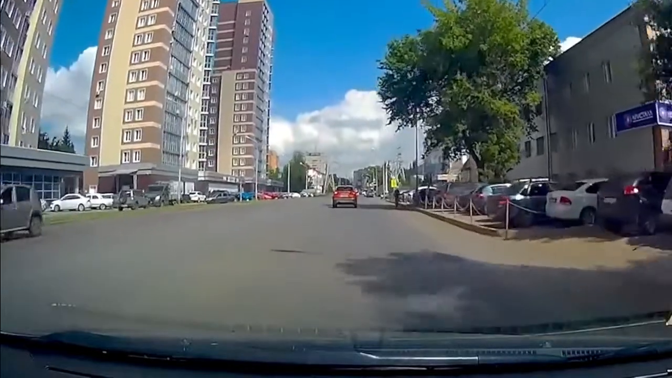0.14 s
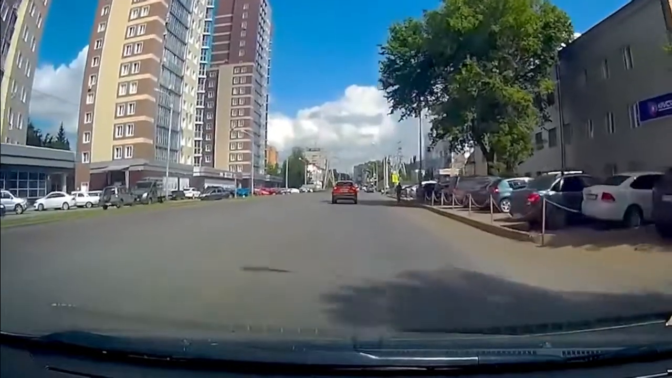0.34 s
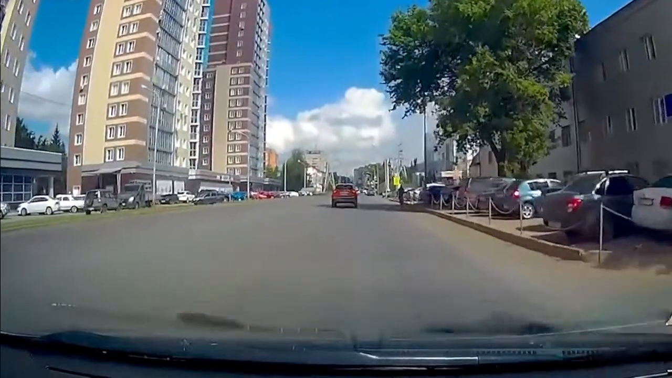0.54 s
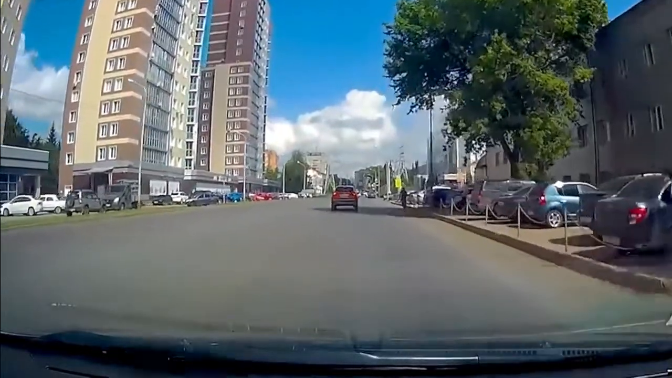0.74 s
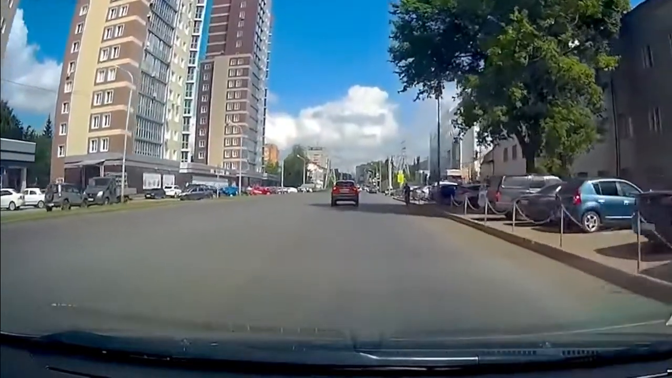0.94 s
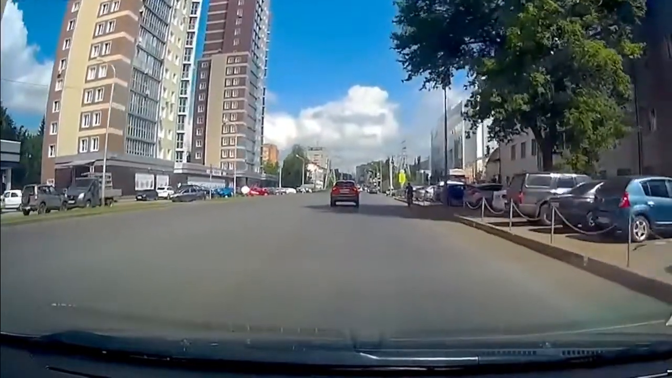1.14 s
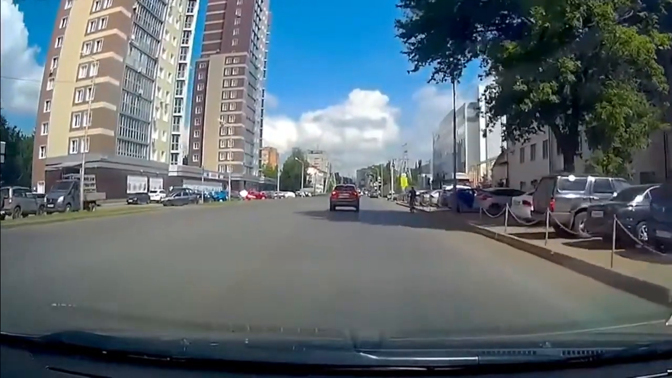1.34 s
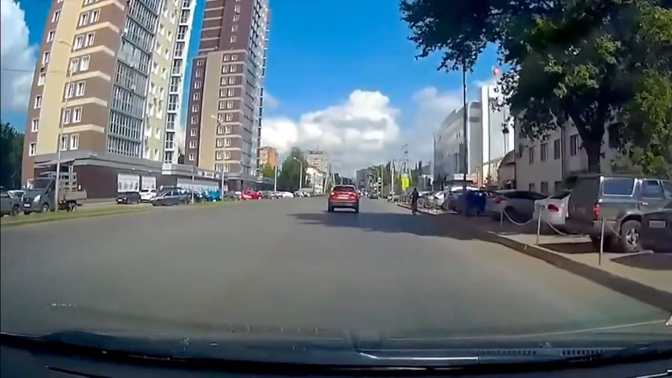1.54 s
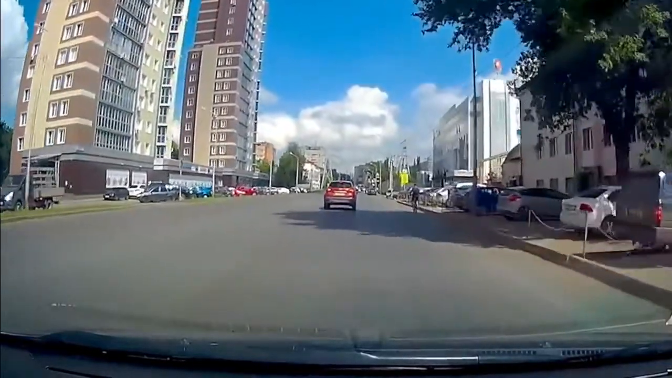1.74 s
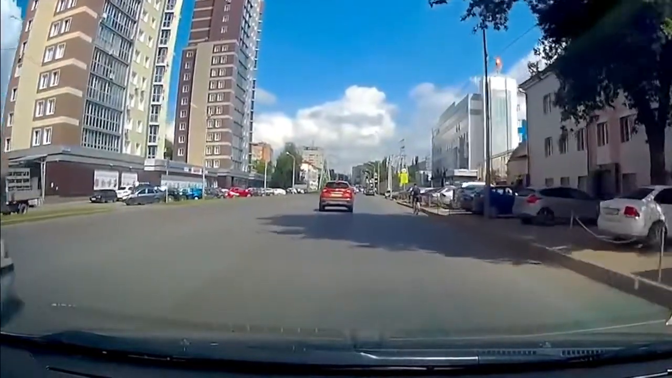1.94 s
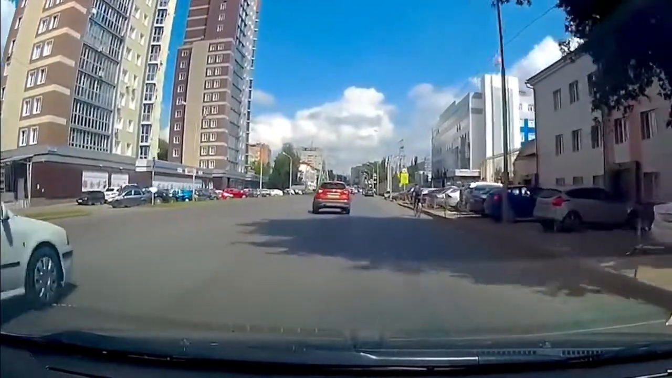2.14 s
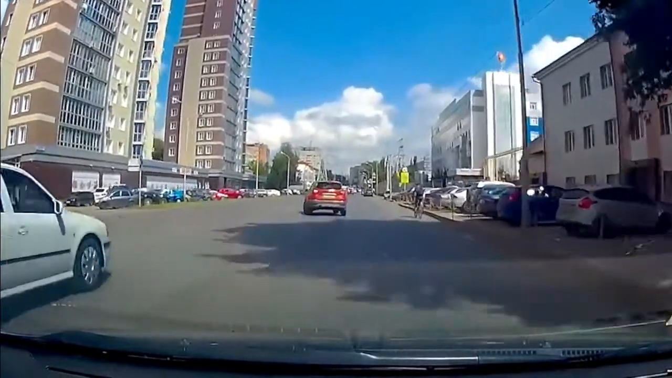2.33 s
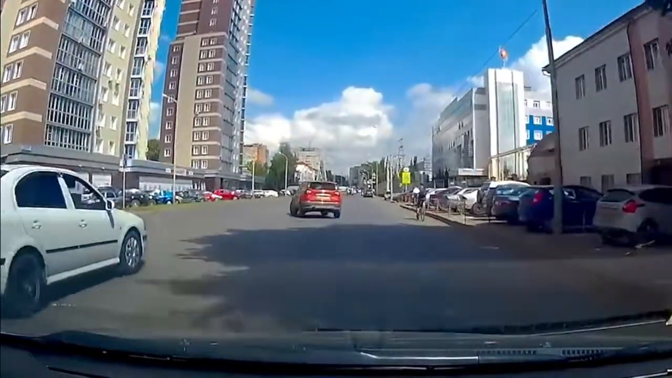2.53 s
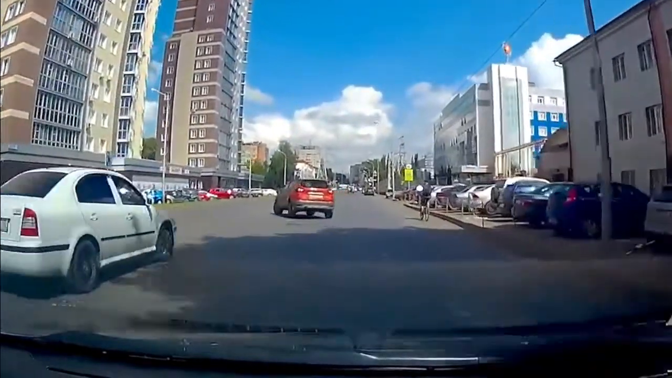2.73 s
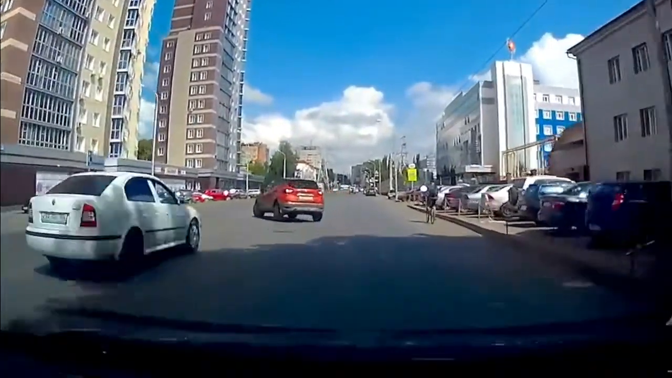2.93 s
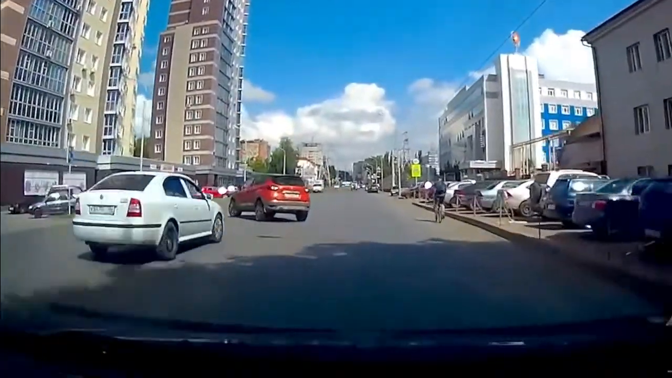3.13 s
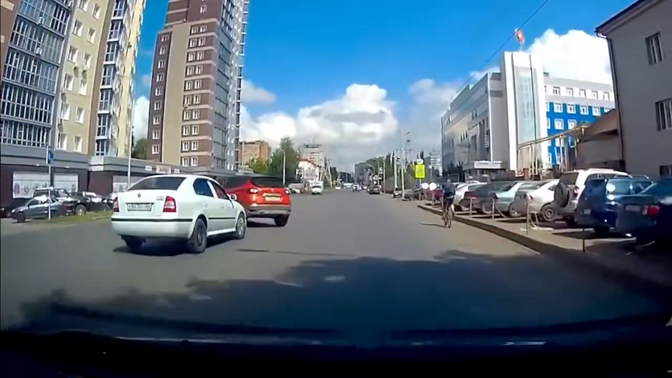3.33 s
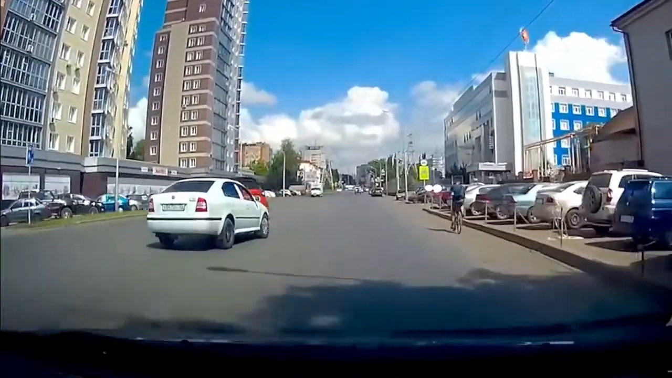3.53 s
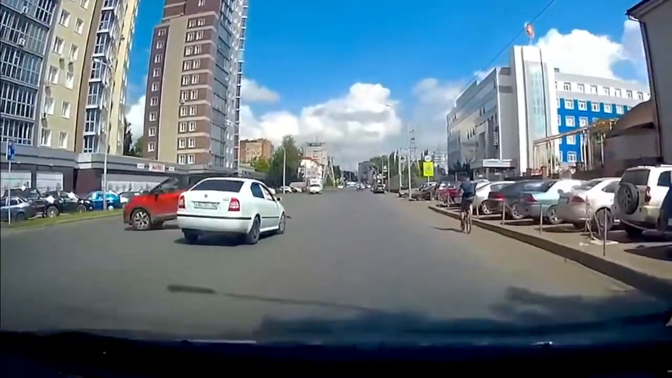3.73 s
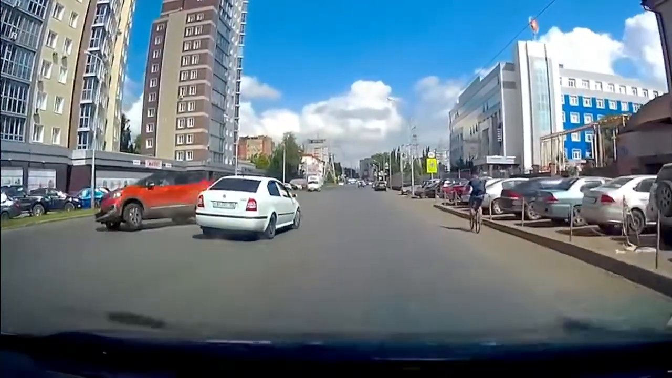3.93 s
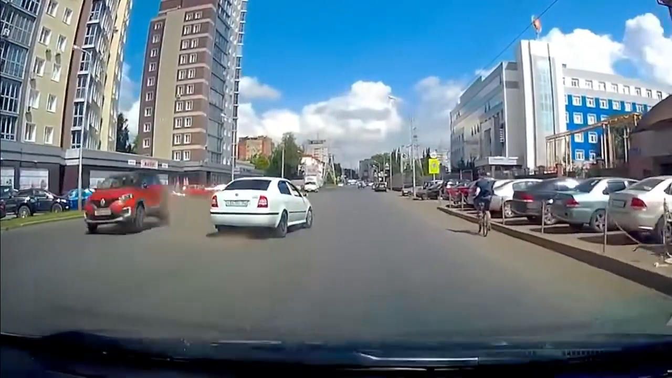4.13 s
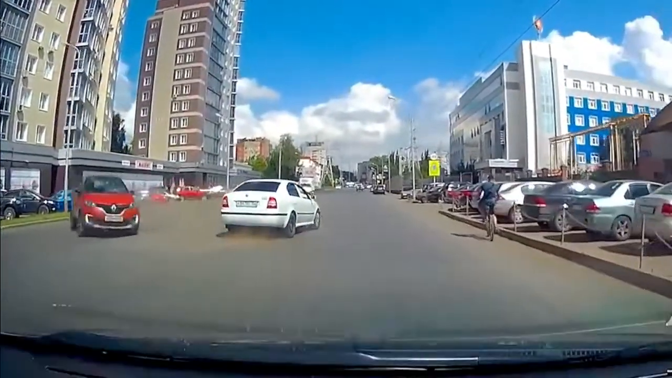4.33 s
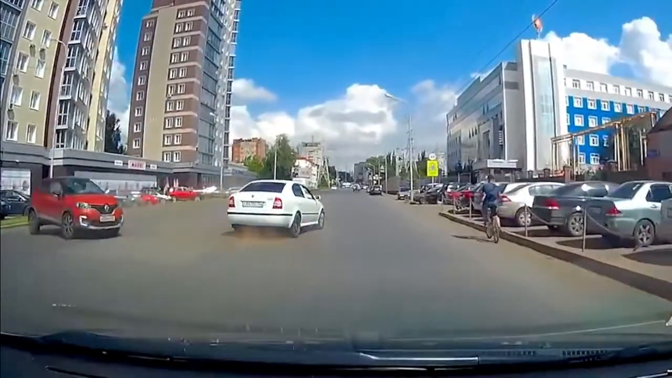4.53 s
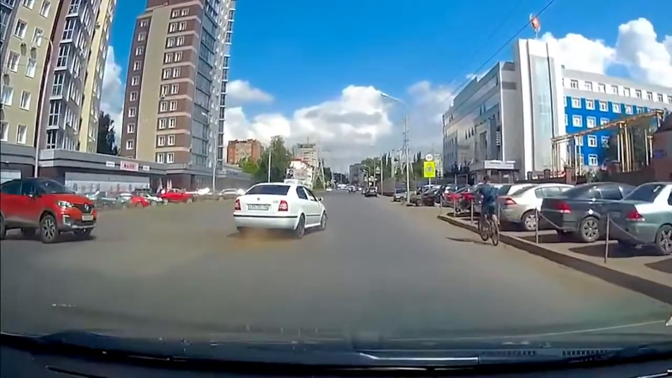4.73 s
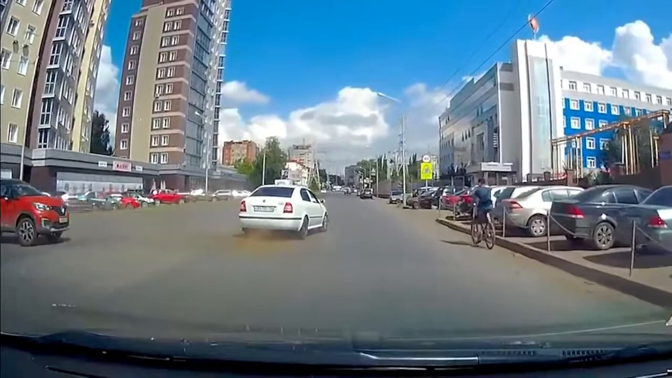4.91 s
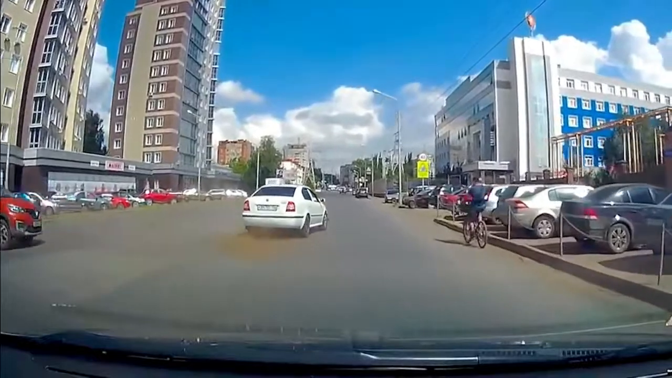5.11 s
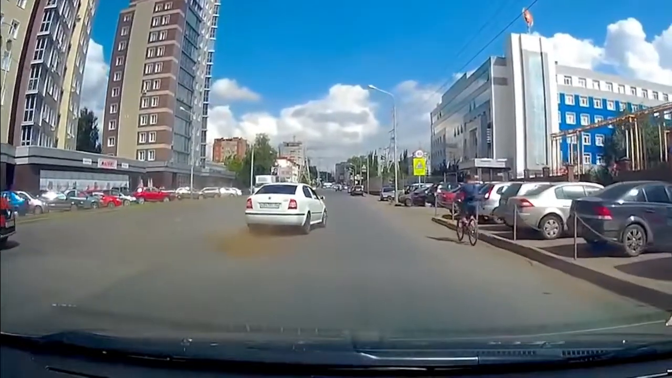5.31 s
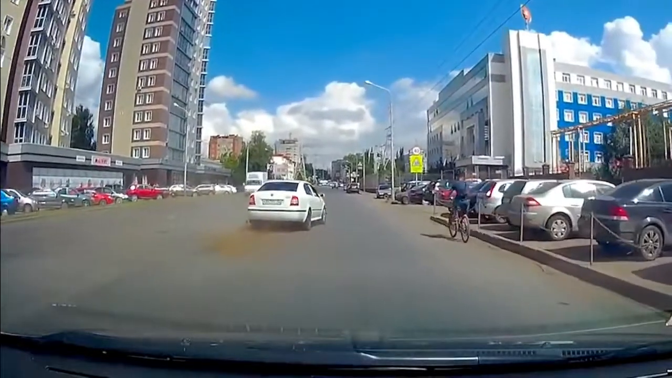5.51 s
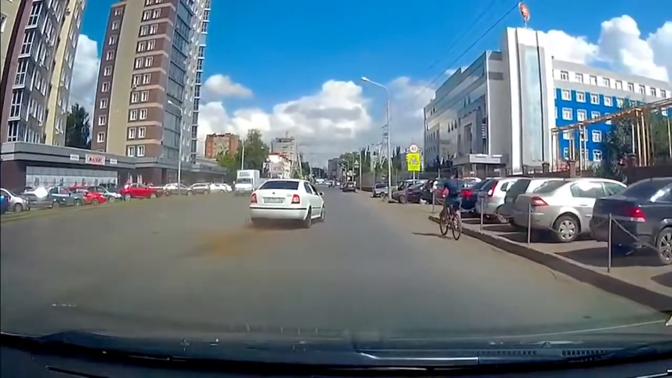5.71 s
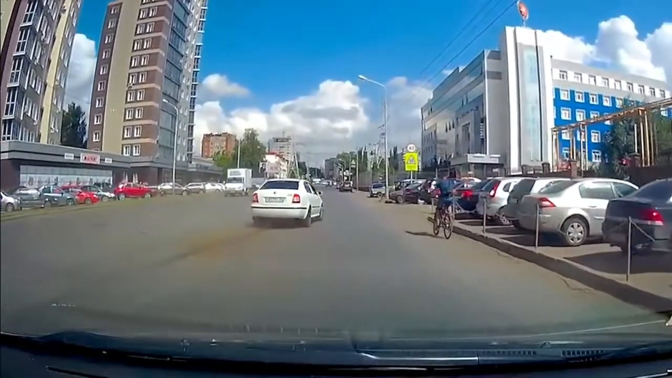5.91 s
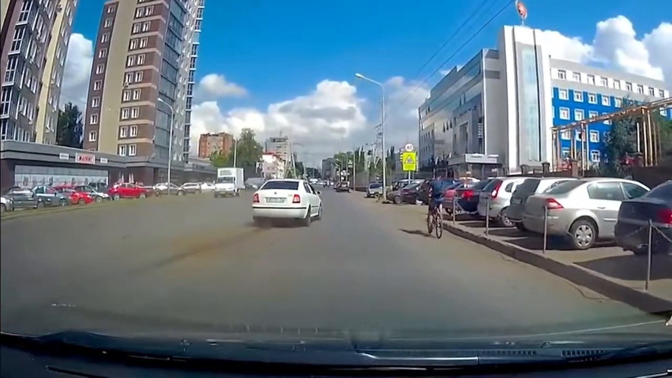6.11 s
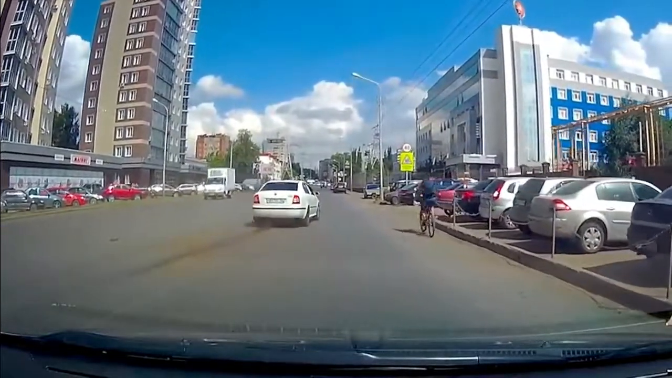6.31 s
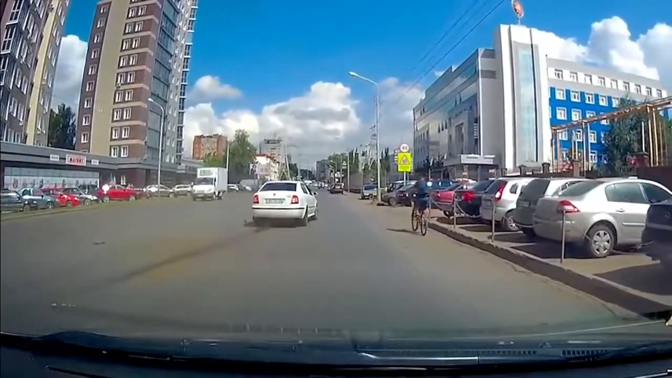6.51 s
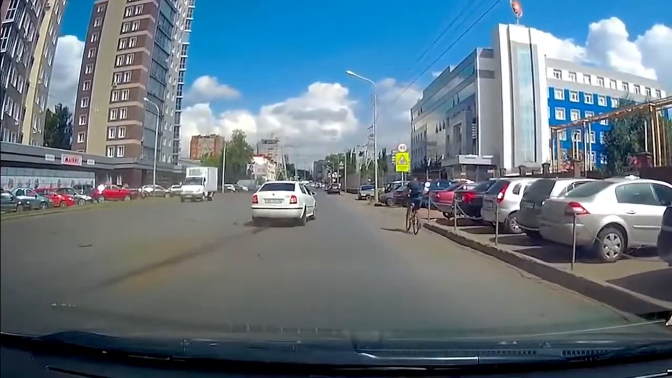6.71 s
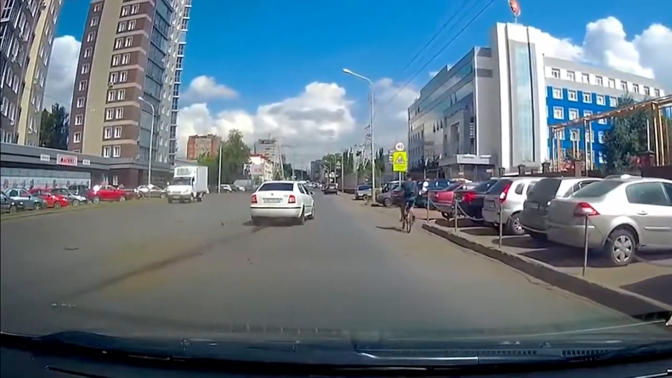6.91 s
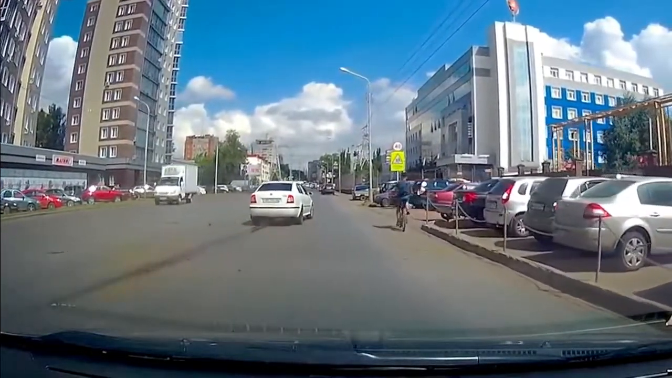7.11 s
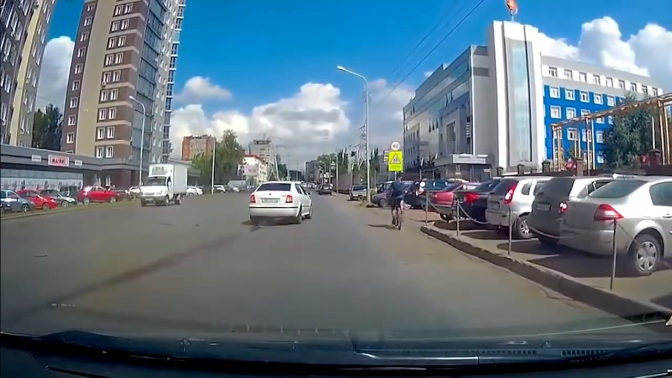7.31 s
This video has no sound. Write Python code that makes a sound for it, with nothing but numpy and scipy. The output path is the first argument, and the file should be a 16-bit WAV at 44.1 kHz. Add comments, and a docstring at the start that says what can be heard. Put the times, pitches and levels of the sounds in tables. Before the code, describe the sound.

From inside a moving car, low body rumble, a boomy drone near the bottom of the range and grainy tyre roar fill the first three seconds. The roar swells around 1.1 to 2 seconds as another car passes, with dull bumps near 1.1, 1.3 and 3.1. At about 3.25 tyres ahead chirp high and wavering. From 3.6 to 3.8 rapid hollow thuds and crunches fuse into one loud collision, with splintering behind. From 3.9 to 5.3 a spinning car screeches in rough, broken bites, mostly climbing in pitch, over scrubbing rubber; strongest around 4.6. Small fragments tick, clatter and clink until about 6, with street echo. The listening car slows, its rumble thinning, with a soft jolt near 5. After 6 a very faint, high brake tone pulses and bends over low rumble and microphone hiss.

```python
"""Street crash heard from a moving car

Low rumble and tyre roar, made of coloured noise, fill the cabin, while another car passes early on.
Ahead, tyres chirp and screech: wavering tones with overtones. Two cars collide in quick bursts of noise.
Debris clatters as noise bursts and short ringing tones, and the street adds an echo.
The listening car slows, and near the end one brake sings faintly as a tone that bends in pitch."""
import sys
import numpy as np
from scipy import signal
from scipy.fft import rfft, irfft, next_fast_len
from scipy.io import wavfile
from scipy.ndimage import uniform_filter1d, map_coordinates

SR = 44100
rng = np.random.default_rng(int(sys.argv[2]) if len(sys.argv) > 2 else 0)


def persist_wave(psi):
    """Save psi, clipped to +-1, as 16-bit WAV."""
    counts = np.round(np.clip(psi, -1, 1) * 32767).astype(np.int16)
    wavfile.write(sys.argv[1], SR, np.atleast_2d(counts).T)


N = 324261

# Body panels colliding: start_s, thud_db, crunch_db, fade_s (time to fall 60 dB)
BLOWS = [(3.602, -46, -38, .15), (3.687, -16, -32.5, 0.35), (3.703, -18, -18.5, 0.32),
         (3.736, -15, -21, 0.27), (3.776, -17, -24, 0.49), (3.81, -35, -27.5, 0.35)]
# Hollow resonances of the panels: pitch_hz, width_hz, relative_level_db
PANEL_MODES = [(41, 15, 11.5), (119, 28, 5.5), (168, 43, 7), (246, 34, 1.5), (336, 130, -1),
               (446, 31, -2.5)]
# Colour of the crunch: pitch_hz, relative_level_db (per Hz)
CRUNCH_COLOUR = [(260, -46), (450, -22), (503, -1.5), (695, -12), (788, -2), (1060, -1.5), (1140, -6.5),
                 (1660, -11), (2400, -50), (3120, -68), (5280, -120)]
# Colour of breaking plastic and glass: pitch_hz, relative_level_db (per Hz)
SHARD_COLOUR = [(600, -71), (1200, -25.5), (1700, 10), (2500, 7), (4000, 7.5), (4800, -3.5), (6000, 2.5),
                (6600, -7), (7500, -2.5), (9100, -13.5), (11100, -15), (15900, -35.5)]
# Lamps and bumpers splintering
SHATTER_START_S, SHATTER_LENGTH_S, SHATTER_DB = 3.695, 0.081, -39

# The swerve before the blow: time_s, pitch_hz, level_db
SWERVE = [(3.22, 1856, -68), (3.27, 1784, -35.5), (3.4, 1638, -32), (3.47, 1633, -39.5),
          (3.55, 1687, -49.5), (3.64, 1734, -37.5), (3.71, 1646, -54)]
# The second swerving tyre: pitch ratio, level against the first, and its loss from the swerve's start
PARTNER_RATIO, PARTNER_DB, PARTNER_FADE_DB_PER_S = 1.155, -2.5, 24.5
# Pitch of the spinning car's front tyres: time_s, pitch_hz
FRONT_PITCH = [(4.12, 808), (4.175, 655.6), (4.2, 833), (4.29, 809.5), (4.54, 865), (4.64, 975),
               (4.72, 996.6), (4.81, 939.4), (5.12, 1108), (5.8, 1115)]
# Pitch of its rear tyres: time_s, pitch_hz
REAR_PITCH = [(3.9, 1045), (4.38, 1028), (4.82, 1068), (4.9, 1108), (5.02, 1249), (5.15, 1181)]
# Front tyres biting, before the spin fades: start_s, length_s, level_db, roughness (0-1), octave_db
# (octave_db is the octave overtone before squeal() lowers it by 1 dB and wavers it)
FRONT_BITES = [(4.095, 0.085, -26.5, 0.68, -11), (4.19, .15, -28.5, 0.38, 1.5),
               (4.545, 0.12, -23.5, 0.64, -5.5), (4.625, 0.13, -18.5, .36, -18.5),
               (4.845, 0.13, -25, 0.54, -19.5), (5.03, 0.081, -29, 0.5, -14),
               (5.115, 0.11, -24, 0.34, -21.5), (5.24, 0.6, -29, 0.49, -23)]
# Rear tyres biting, same meaning: start_s, length_s, level_db, roughness (0-1), octave_db
REAR_BITES = [(3.89, 0.013, -24.5, 0.34, -13), (3.98, 0.088, -25.5, 0.31, -23),
              (4.35, 0.028, -23.5, .6, -19), (4.5, 0.042, -26, 0.61, -22), (4.68, .11, -25.5, .4, -19),
              (4.9, .18, -28.5, 0.76, -23.5), (5.14, .6, -33.5, 0.81, -32)]
# Rise time and 60 dB fall time of each bite; then when the spin runs out and how fast it fades
BITE_RISE_S, BITE_FADE_S, SPIN_ENDS_S, SPIN_FADE_DB_PER_S = .01, .14, 5.11, 45.5
# Short high yelps of the tread: start_s, length_s, pitch_hz, level_db
YELPS = [(3.88, 0.033, 2167, -33.5), (3.927, 0.025, 2190, -44), (4.337, 0.035, 2172, -40),
         (4.742, 0.066, 1850, -40.5)]
# What the windscreen does to the squeals: pitch_hz, gain_db
WINDSCREEN = [(500, 3), (1700, -3), (2150, -2), (2450, -6), (3000, 2), (3450, -1), (4050, 1), (4600, -13),
              (5300, -4.5), (6000, 10), (8000, -23)]
# Rubber and torn trim scrubbing over the asphalt: time_s, level_db (before wavering)
SLIDE = [(3.92, -48), (3.98, -24.5), (4.18, -29), (4.28, -34.5), (4.37, -30), (4.6, -30.5), (4.8, -39.5),
         (5.6, -51.5), (6.5, -68)]
# Colour of that scrubbing: pitch_hz, relative_level_db (per Hz)
SCRUB_COLOUR = [(260, -51), (450, -19.5), (643, -11), (835, -3), (932, -5), (1030, 8.5), (1150, -5.5),
                (1310, 1), (1470, -11), (1660, -7), (1850, -21.5), (3890, -32.5), (12000, -59),
                (15600, -76.5), (22000, -120)]

# The largest fragments landing: start_s, level_db (before the overall debris gain)
DEBRIS = [(4.1634, -45.5), (4.1969, -49), (4.3206, -50.5), (4.4448, -46.5), (4.4794, -50), (4.6264, -52),
          (4.7646, -49), (4.8304, -48), (5.0235, -52), (5.0484, -51), (5.1284, -58), (5.1916, -57),
          (5.237, -53), (5.3328, -53.5), (5.453, -58), (5.5364, -56.5), (5.5947, -55), (5.7029, -58)]
# Small pieces tumbling on: first level, then the loss as they scatter
TUMBLE_START_S, TUMBLE_LENGTH_S, TUMBLE_DB, TUMBLE_LOSS_DB_PER_S = 3.91, 2.25, -51.5, 6.5
# Loose trim and bright shards ringing: start_s, pitch_hz, level_db (before the attack and fade)
CLINKS = [(4.169, 3250, -38), (5.333, 3260, -46.5), (5.545, 1690, -40), (5.555, 4000, -56),
          (5.615, 1646, -58), (5.76, 1698, -49), (5.769, 3930, -56), (5.834, 4010, -54), (6.03, 3916, -59)]

# The listening car's speed: time_s, share_of_cruising_speed
SPEED = [(0, 1.044), (2.2, 0.89), (3.05, 1.034), (3.7, 0.75), (4.4, 0.56), (5.3, 0.39), (6.4, 0.27),
         (7.35, .27)]
# Tyre roar on asphalt: time_s, level_db (before wavering)
ROLL = [(0, -37), (.7, -33), (1.25, -29.5), (1.9, -33), (2.3, -35), (3.2, -39.5), (4.2, -41.5),
        (4.9, -55.5), (7.35, -55)]
# Uneven stretches of road rocking the body: start_s, length_s, level_db
UNEVEN = [(0.0, 0.14, -28), (1.306, .15, -28), (4.963, 0.34, -28), (7.07, .25, -37)]
# Colour of the body's sway: pitch_hz, relative_level_db (per Hz)
SWAY_COLOUR = [(9, -31.5), (18, -3), (28, 10), (41, -10), (53, 6), (61, -12), (73, -15.5), (105, -54.5),
               (175, -110)]
# Colour of the cabin's early boom: pitch_hz, relative_level_db (per Hz)
BOOM_COLOUR = [(35, -2), (60, -1), (81, -5), (109, -6.5), (147, 0), (204, -9.5), (321, -12.5), (416, -19.5),
               (470, -22.5), (550, -29.5), (720, -27), (1210, -120)]
# Colour of its later boom, at low speed: pitch_hz, relative_level_db (per Hz)
COAST_COLOUR = [(33, -37.5), (58, -31), (78, 1.5), (100, -2.5), (148, -3.5), (165, -1.5), (185, -7.5),
                (260, -13.5), (405, -18), (450, -26.5), (620, -26.5), (800, -53), (1400, -110)]
# Colour of the tyre roar: pitch_hz, relative_level_db (per Hz)
ROAR_COLOUR = [(240, -15.5), (400, 3.5), (468, -9.5), (599, 2.5), (700, -5.5), (830, 0.5), (1010, 4.5),
               (1120, 0), (1290, 3), (1610, -4), (2410, -20.5), (3960, -33), (4630, -50), (5630, -61.5),
               (9000, -84), (11700, -98), (19800, -120)]
# Colour of the tread's fine hiss: pitch_hz, relative_level_db (per Hz)
TREAD_COLOUR = [(950, -58), (1550, -6), (2050, 5.5), (2550, -7), (3850, -5.5), (4650, -21), (5750, -10.5),
                (6550, -26), (7550, -23.5), (9500, -42), (14000, -80)]
# Levels at cruising speed (dB) and their growth (dB per tenfold speed)
SWAY_DB, SWAY_GROWTH_DB, BOOM_DB, BOOM_GROWTH_DB = -28.5, 22, -26, 33.5
# Tread hiss: level at the loudest roar (dB), and dB lost for each dB the roar drops
FIZZ_DB, FIZZ_FOLLOWS = -52.5, 1.3
# Wheels dropping into dips: start_s, pitch_hz, level_db (before a 6.5 dB boost and the fade)
BUMPS = [(1.091, 43.6, -15.5), (1.28, 38.2, -15), (3.125, 41, -18.5), (4.956, 42.02, -24)]

# Colour of the overtaking car's tyres: pitch_hz, relative_level_db (per Hz)
PASSING_COLOUR = [(450, -33), (820, 10.5), (1100, -7), (1550, 1.5), (1900, -7.5), (2400, -23.5),
                  (3800, -19.5), (5800, -40), (9000, -51)]
# Echo of the street: pitch_hz, fade_s (time to fall 60 dB)
STREET = [(100, 0.23), (1000, 0.97), (4000, 0.92), (12000, 0.53)]
# Colour of the microphone's own noise: pitch_hz, relative_level_db (per Hz)
HISS_COLOUR = [(200, 2), (2500, 0.5), (5000, -1), (8500, -3.5), (11000, -3.5), (14800, -4.5), (15700, -14)]
TOP_HZ = 15650  # nothing is kept above this


def amp(db):
    """Turn decibels into a multiplier."""
    return 10 ** (np.asarray(db) / 20)


def unit(x):
    """Scale a sound to an average (rms) strength of 1."""
    return x / np.sqrt(np.mean(x ** 2) + 1e-20)


def clock():
    """Give the time of every sample in seconds."""
    return np.arange(N) / SR


def curves(rows):
    """Join table points with straight lines, one curve per column after the time."""
    s, *columns = np.transpose(rows)
    return [np.interp(clock(), s, column) for column in columns]


def during(rows):
    """Give 1 while a table lasts, with 10 ms soft edges, and 0 elsewhere."""
    since_start = clock() - rows[0][0]
    until_end = rows[-1][0] - clock()
    return np.clip(np.minimum(since_start, until_end) / .01, 0, 1)


def along(points, hz):
    """Read values between (pitch, value) points on a log pitch axis."""
    f, values = np.transpose(points)
    return np.interp(np.log(hz + 1), np.log(f + 1), values)


def wobble(rate):
    """Draw a smooth random curve with this many random points a second."""
    return map_coordinates(rng.standard_normal(N // 8), [clock() * rate], mode="wrap")


def filtered(x, response):
    """Strengthen or weaken each frequency of a sound by a response."""
    m = next_fast_len(N + SR // 2)
    hz = np.fft.rfftfreq(m, 1 / SR)
    return irfft(rfft(x, m) * response(hz), m)[:N]


def noise(colour, grain_db=0):
    """Make coloured noise of rms 1; grain_db clumps it into tiny snaps."""
    x = rng.standard_normal(N)
    if grain_db:
        x = x * amp(grain_db * wobble(700))
    return unit(filtered(x, lambda hz: amp(along(colour, hz))))


def burst(s, attack, t60):
    """Shape a blow at time s: a quick rise, then a fall of 60 dB in t60 seconds."""
    t = np.maximum(clock() - s, 0)
    return (1 - np.exp(-t / attack)) * np.exp(-np.log(1000) * t / t60)


def held(s, length, attack, t60):
    """Shape a sound that rises at time s, holds until its length has passed and dies away."""
    t = clock() - s
    rise = np.clip(t / attack, 0, 1)
    return rise * np.exp(-np.log(1000) * np.clip((t - length) / t60, 0, 2))


def crash():
    """Panels buckle in quick blows, each a hollow thud and a crunch; splintering swells just behind."""
    def panel_response(f):
        total = 0
        for k, (center, width, db) in enumerate(PANEL_MODES):
            damping = 1j * f * width
            # neighbouring resonances push in opposite directions
            total = total + (-1) ** k * amp(db) * damping / (center * center - f * f + damping)
        return total / (1 + (f / 650) ** 4)

    hollow = unit(filtered(rng.standard_normal(N), panel_response))
    # overlapping blows add as power
    thud = np.sqrt(sum((amp(db) * burst(s, 0.0041, t60)) ** 2 for s, db, _, t60 in BLOWS))
    crunch = np.sqrt(sum((amp(db) * burst(s, 0.0037, t60)) ** 2 for s, _, db, t60 in BLOWS))
    swell = held(SHATTER_START_S, SHATTER_LENGTH_S, attack=0.035, t60=0.68)
    splinters = amp(SHATTER_DB) * swell * noise(SHARD_COLOUR)
    return thud * hollow + crunch * noise(CRUNCH_COLOUR, grain_db=2.5) + splinters


def skid():
    """Tyres squeal through the windscreen's filter, over noise from scrubbing rubber and trim."""
    slide_db, = curves(SLIDE)
    scrub_gain = amp(slide_db + 2.7 * wobble(35)) * during(SLIDE)
    scrub = scrub_gain * noise(SCRUB_COLOUR, grain_db=2.0)
    squeals = swerve() + yelps() + spin()
    return filtered(squeals, lambda hz: amp(along(WINDSCREEN, hz))) + scrub


def swerve():
    """Two tyres chirp together under the same load, with pitches that move in step."""
    hz, db = curves(SWERVE)
    low = squeal(hz, rough=0.77, overtones_db=[-34], wander=.018, jitter=0.027, flutter_hz=258.5)
    high = squeal(PARTNER_RATIO * hz, rough=.85, overtones_db=[-8, -33],
                  wander=.01, jitter=0.026, flutter_hz=354)
    elapsed = np.maximum(clock() - SWERVE[0][0], 0)
    partner_db = PARTNER_DB - PARTNER_FADE_DB_PER_S * elapsed
    return amp(db) * during(SWERVE) * (low + amp(partner_db) * high)


def spin():
    """Front and rear tyres bite and screech at mostly climbing pitches, then fade as the spin runs out."""
    gain, rough, octave_db = bites(FRONT_BITES)
    third_db = 0.69 * octave_db - 22  # upper overtones follow the octave only in part
    front_hz, = curves(FRONT_PITCH)
    front = gain * squeal(front_hz, rough, overtones_db=[octave_db, third_db, third_db - 14.5],
                          wander=0.0285, jitter=0.045, flutter_hz=149.2)
    gain, rough, octave_db = bites(REAR_BITES)
    rear_hz, = curves(REAR_PITCH)
    rear = gain * squeal(rear_hz, rough, overtones_db=[octave_db, octave_db - 14],
                         wander=0.0416, jitter=0.041, flutter_hz=172.8)
    fade_db = -SPIN_FADE_DB_PER_S * np.maximum(clock() - SPIN_ENDS_S, 0)
    return amp(fade_db) * (front + rear)


def yelps():
    """The tread's edge catches for an instant, giving high, rough tones."""
    gain, hz = bites([(s, length, db, hz) for s, length, hz, db in YELPS])
    return gain * squeal(hz, rough=.78, overtones_db=[-26], wander=.02, jitter=.028, flutter_hz=220)


def squeal(hz, rough, overtones_db, wander, jitter, flutter_hz):
    """Tread sticks and slips at a wandering pitch; roughness breaks the tone into beating shreds."""
    rough = np.clip(rough, 0, 1)
    pitch = hz * (1 + rough * (wander * wobble(45) + jitter * wobble(420)))
    phase = 2 * np.pi * np.cumsum(pitch) / SR
    levels_db = [0] + [db - 1 + 4 * wobble(26) for db in overtones_db]
    out = np.zeros(N)
    for k, level_db in enumerate(levels_db, 1):
        rate = flutter_hz * np.sqrt(k)  # overtones fray more than the fundamental
        shreds = (wobble(rate) + 1j * wobble(rate)) / np.sqrt(2)
        steady = (1 - rough ** 2) ** np.sqrt(k)  # share of power left in the clean tone
        mix = np.sqrt(steady) + np.sqrt(1 - steady) * shreds
        out += amp(level_db) * np.real(mix * np.exp(1j * k * phase))
    return np.sqrt(2) * out


def bites(rows):
    """Join the tyre bites' loudness by power; other columns follow whichever bite is sounding."""
    power = np.array([(amp(db) * held(s, length, BITE_RISE_S, BITE_FADE_S)) ** 2
                      for s, length, db, *_ in rows])
    total = power.sum(axis=0)
    averages = np.array(rows)[:, 3:].T @ power / (total + 1e-30)
    return np.sqrt(total), *averages


def debris(gain_db=-1, t60=0.21, bright_db=2):
    """Plastic and glass land in short noise bursts, tilted by bright_db per octave, as small bits tumble."""
    landings = np.sqrt(sum((amp(db) * burst(s, 0.001, t60)) ** 2 for s, db in DEBRIS))
    colour = [(hz, db + bright_db * np.log2(hz)) for hz, db in SHARD_COLOUR]
    return amp(gain_db) * landings * noise(colour, grain_db=2.0) + tumble()


def tumble(count=1400, ring_hz=2900, t60=0.077, spread_db=3):
    """Hundreds of small pieces bounce along the road, each ticking at its own four pitches."""
    t = np.arange(SR // 20) / SR
    starts = rng.integers(0, N - len(t), count)  # spread over the whole scene, then faded in and out
    size = amp(spread_db * np.clip(rng.standard_normal((count, 1)), -2, 1.6))
    pitches = ring_hz * np.exp(0.65 * rng.standard_normal((count, 4, 1)))
    pitches = np.clip(pitches, 900, 12000)
    tones = np.sin(2 * np.pi * pitches * t).sum(axis=1)
    ticks = size * tones * np.exp(-np.log(1000) * t / t60)
    places = starts[:, None] + np.arange(len(t))
    rattle = np.bincount(places.ravel(), ticks.ravel(), N)
    coloured = unit(filtered(rattle, lambda hz: amp(along(SHARD_COLOUR, hz))))
    db = TUMBLE_DB - TUMBLE_LOSS_DB_PER_S * (clock() - TUMBLE_START_S)
    return amp(db) * held(TUMBLE_START_S, TUMBLE_LENGTH_S, attack=.13, t60=1.8) * coloured


def clinks(t60=0.12, second=1.06, third=1.7):
    """Stiff pieces ring with two close tones that beat together and a weaker high one."""
    t = np.arange(SR // 3) / SR
    modes = [(1, .7), (second, .35), (third, .15)]  # pitch ratio, strength
    out = np.zeros(N)
    for s, hz, db in CLINKS:
        ring = sum(gain * np.sin(2 * np.pi * hz * ratio * t) for ratio, gain in modes)
        shape = amp(db - 60 * t / t60) * (1 - np.exp(-t / .002))
        out[round(s * SR):][:len(t)] += shape * ring
    return out


def road():
    """The body sways, the cabin booms and the tread roars; speed sets the boom and steady sway."""
    speed, = curves(SPEED)
    roar_db, = curves(ROLL)
    decades = np.log10(np.abs(speed))
    early = np.clip((5.0 - clock()) / 0.95, 0, 1)  # 1 at first, 0 from 5 s on
    rocking = sum(amp(db) * held(s, length, attack=.03, t60=0.47) for s, length, db in UNEVEN)
    sway_gain = np.hypot(amp(SWAY_DB + SWAY_GROWTH_DB * decades), rocking)
    sway = sway_gain * noise(SWAY_COLOUR)
    boom_mix = np.sqrt(early) * noise(BOOM_COLOUR) + np.sqrt(1 - early) * noise(COAST_COLOUR)
    boom = amp(BOOM_DB + BOOM_GROWTH_DB * decades) * boom_mix
    roar = amp(roar_db + 0.38 * wobble(9.6)) * noise(ROAR_COLOUR)
    fizz = amp(FIZZ_DB + FIZZ_FOLLOWS * (roar_db - roar_db.max())) * noise(TREAD_COLOUR)
    return sway + boom + roar + fizz


def drone(hz=143, width_hz=13, level_db=-34.5, growth_db=27):
    """The road excites the cabin's air at its strongest resonance, less as the car slows."""
    speed, = curves(SPEED)
    air = unit(filtered(rng.standard_normal(N), lambda f: 1 / (1 + ((f - hz) / width_hz) ** 4)))
    return amp(level_db + growth_db * np.log10(np.abs(speed))) * air


def bumps(t60=0.21):
    """Each dip sets the car's body shuddering for a few cycles of a fading low tone."""
    out = np.zeros(N)
    for s, hz, db in BUMPS:
        shudder = -np.sin(2 * np.pi * hz * (clock() - s))
        out += amp(db + 6.5) * burst(s, 0.003, t60) * shudder
    return out


def brake(hz=1788, turn_s=.221, rub_at=6.49, bend_hz=32, level_db=-60, full_at=6.45, rise_db_per_s=21):
    """Once a turn the disc's high spot presses the pad: the tone gets higher and louder, then sags back."""
    db = level_db - rise_db_per_s * np.maximum(full_at - clock(), 0)
    turn = ((clock() - rub_at) / turn_s) % 1
    press = uniform_filter1d(np.clip(1 - turn / .5, 0, 1), size=700)  # soften the jump
    pitch = hz + bend_hz * press + 3 * wobble(70)
    phase = 2 * np.pi * np.cumsum(pitch) / SR
    return amp(db + 5.1 * press) * np.sin(phase)


def overtaking(at=1.11, length=0.92, level_db=-36):
    """A faster car draws level; its tyre roar swells in flurries and drops as it passes the bonnet."""
    swell = held(at, length, attack=0.31, t60=0.73)
    return amp(level_db + 2.4 * wobble(14)) * swell * noise(PASSING_COLOUR)


def street(x):
    """House fronts answer with an echo of fading noise, in which the middle pitches linger longest."""
    hz, t, z = signal.stft(rng.standard_normal(SR), SR, nperseg=256)
    fading = z * amp(-60 * t / along(STREET, hz)[:, None])
    tail = signal.istft(fading, SR, nperseg=256)[1]
    echo = np.pad(tail, (400, 0)) / np.linalg.norm(tail)  # 400 samples pass before the echo
    return signal.fftconvolve(x, echo)[:N]


def scene():
    """Add the accident and its echo, the overtaking car and the listening car's own sounds."""
    outside = skid() + crash() + debris() + clinks()
    inside = road() + drone() + bumps() + brake()
    return (outside + amp(-9.5) * street(outside) + overtaking() + inside)[None]


def record(dry):
    """The microphone adds hiss and a thin electronic whine, and keeps nothing above its band limit."""
    floor = amp(-66.5) * noise(HISS_COLOUR)
    tones = sum(np.sin(2 * np.pi * hz * clock() + .6 * wobble(25)) for hz in (7903, 7963))
    whine = amp(-76.5) * tones
    return filtered(dry[0] + floor + whine, lambda hz: hz < TOP_HZ)[None]


dry = scene()
out = record(dry)
persist_wave(out)
```